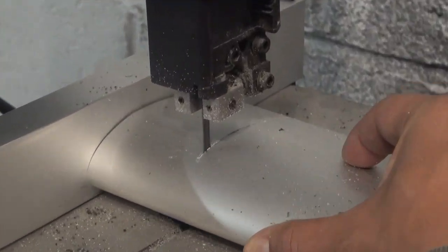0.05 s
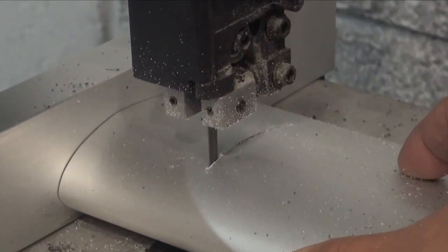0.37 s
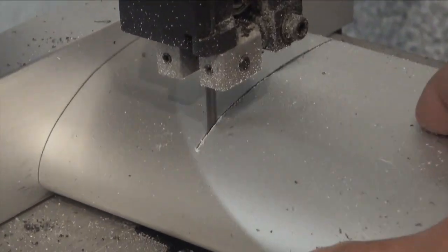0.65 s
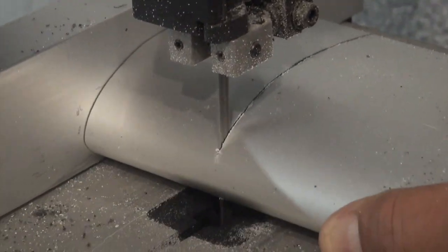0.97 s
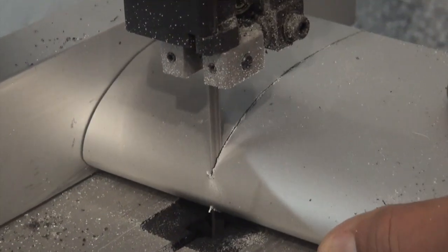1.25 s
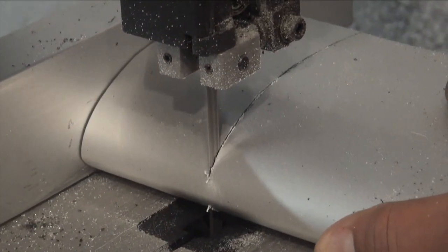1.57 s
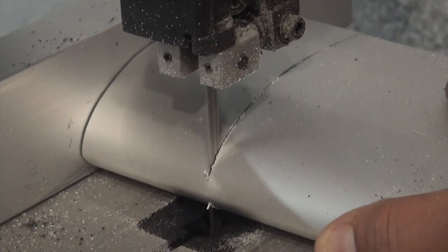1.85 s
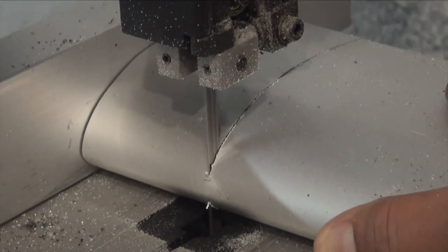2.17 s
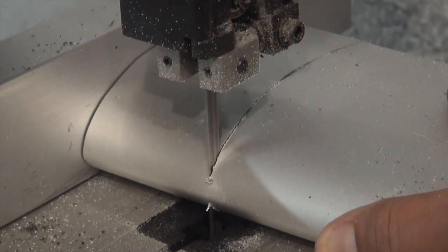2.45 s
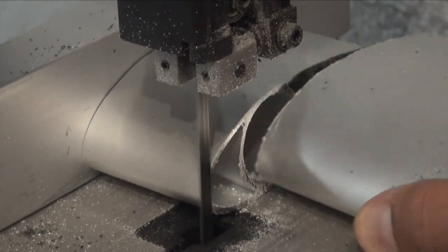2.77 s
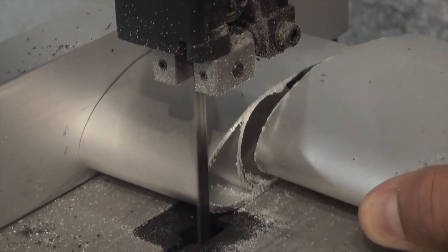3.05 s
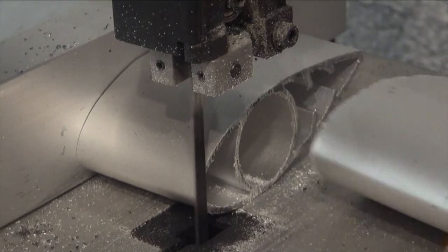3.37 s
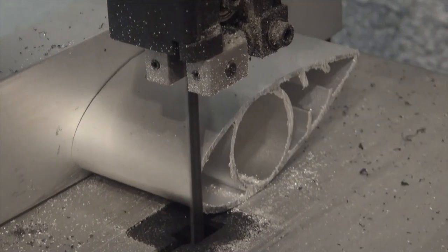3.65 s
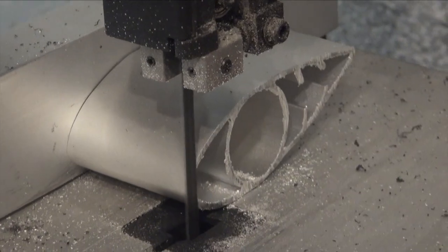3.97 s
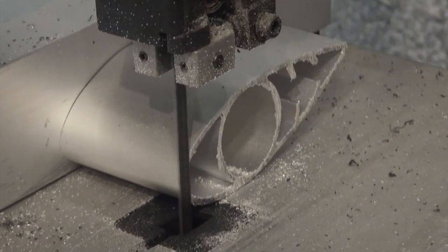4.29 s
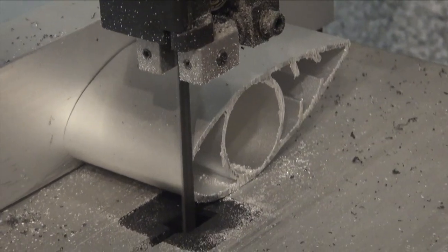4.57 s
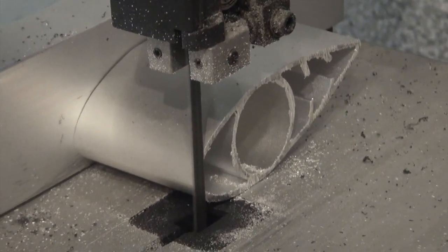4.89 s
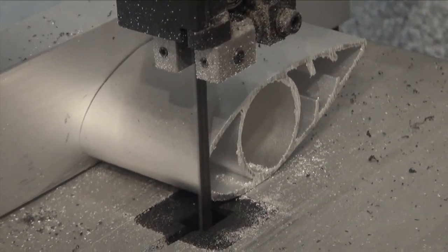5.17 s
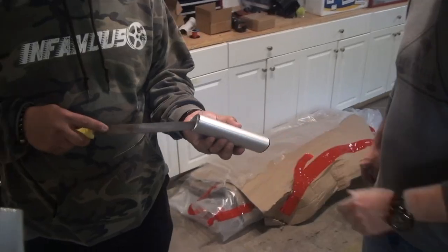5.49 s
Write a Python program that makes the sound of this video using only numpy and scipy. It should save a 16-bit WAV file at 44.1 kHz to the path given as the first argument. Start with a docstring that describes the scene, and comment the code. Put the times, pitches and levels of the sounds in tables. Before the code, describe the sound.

Choppy metallic squeals and a harsh, ringing rasp as a band saw cuts aluminium, followed by the free blade running and rattling.

```python
"""First come sharp squeals in choppy snatches: a benchtop band saw cuts a thin, hollow aluminium bar.
After a tiny gap the teeth rasp through the deep part, ringing the bar while the motor slows.
The freed blade whirrs and rattles in its guides over the motor's hum, and the cut piece slides away.
The saw's sound stops suddenly; a few soft knocks follow, and a file touches the cut piece.
One microphone hears it all from close by."""
import sys
import numpy as np
from scipy import signal
from scipy.fft import rfft, irfft
from scipy.io import wavfile
from scipy.ndimage import uniform_filter1d

SR = 44100
rng = np.random.default_rng(int(sys.argv[2]) if len(sys.argv) > 2 else 0)


def transcribe(u):
    """Save the signal u as a 16-bit wav file named by the first command-line argument.

    u: samples, shape (n,) or (channels, n), limited to [-1, 1]; the rate is SR.
    q: integer samples, one column per channel.
    """
    v = np.clip(np.atleast_2d(u).T, -1, 1)
    q = np.round(v * 32767).astype(np.int16)
    wavfile.write(sys.argv[1], SR, q)


N = 248283
TIME, FREQ = np.arange(N) / SR, np.fft.rfftfreq(N, 1 / SR)
GAP_S, BLADE_FREE_S, SAW_END_S, FILE_S = 1.244, 2.74, 5.247, 5.546
WOBBLES_PER_S = 17.5  # of the loose blade

# Squeals of the thin wall. Each row: start in seconds, length in seconds, pitch in Hz,
# relative level in dB, level of the octave above in dB compared with that.
SQUEALS = [(0, 0.016, 2360, -20.5, 3.5), (.035, 0.05, 1827, -21.5, -9), (0.185, 0.079, 3147, -22.5, -14),
           (0.222, 0.1, 2924, -24, -13), (0.304, 0.095, 2430, -32.5, -14), (0.396, .091, 2620, -23, -26),
           (0.487, 0.073, 2394, -20.5, -29), (0.551, 0.091, 2200, -23.5, -0.5),
           (0.663, .129, 2805, -24.5, -7), (0.836, 0.1, 2792, -17.5, -15), (.935, 0.13, 2484, -19.5, -3),
           (1.084, 0.097, 2025, -27, -11.5)]


def wall_squeals(edge_s=.014, sag_hz_per_s=373):
    """The thin wall squeals at three times the tooth rate, its pitch wavering and sinking."""
    out = np.zeros(N)
    for start, length, hz, db, octave_db in SQUEALS:
        span = slice(max(int((start - edge_s) * SR), 0), int((start + length + edge_s) * SR))
        gate = between(start, start + length, edge_s)[span]
        waver_hz = 22 * wander(24).real[span]
        turns = np.cumsum(hz + waver_hz - sag_hz_per_s * (TIME[span] - start)) / SR
        # the faint tooth rate, the squeal itself, its octave
        for multiple, part_db, width_hz in [(1 / 3, -27.5, 27), (1, 0, 11.2), (2, octave_db, 67)]:
            drift = wander(width_hz)[span]
            wave = (drift / (abs(drift) + .14) ** .45 * np.exp(2j * np.pi * multiple * turns)).real
            out[span] += amp(db + part_db) * unit(gate * wave) * np.sqrt(np.mean(gate))
    return out


# Snatches of sawing. Each row: start in seconds, relative hiss and fizz levels in dB,
# fading in dB per second, pitch of the wall's ring in Hz, its relative level in dB.
SAWING_SNATCHES = [(0, -24.5, -38, 86, 4690, -30.5), (0.078, -34, -39.5, 64.5, 4400, -53),
                   (0.181, -26.5, -30, -27.5, 4430, -25.5), (.335, -26, -34.5, 16, 3960, -28),
                   (0.501, -30.5, -40.5, 10, 4332, -18.5), (0.634, -29, -22.5, 17, 4260, -26),
                   (.792, -24.5, -24, 4, 6130, -19), (0.94, -26.5, -29, 1, 6060, -20),
                   (1.087, -29, -37, 30.5, 5300, -38.5)]
# Tone of the scrape's middle, top and bottom. Each row: frequency in Hz, relative level in dB.
HISS_TONE = [(880, -33), (1500, -16), (1730, -20), (2350, 0), (3200, -2.5), (3660, -7), (4320, 0),
             (5170, -8), (6190, -2.5), (9000, -20), (11700, -55), (19800, -120)]
FIZZ_TONE = [(4710, -51), (8000, -1), (9580, 4.5), (10400, 2), (10700, 1), (11200, 5), (13400, -7),
             (15700, -13.5)]
LOW_SCRAPE_TONE = [(120, -39), (250, -13), (450, 0), (620, -4), (850, 3), (1100, -4.5), (1800, -8),
                   (3500, -35.5)]
# Loudness of the low scrape. Each row: time in seconds, relative level in dB.
LOW_SCRAPE_LEVELS = [(0.0, -29), (0.01, -44), (0.182, -55.5), (0.832, -39), (0.99, -35.5), (1.08, -32),
                     (1.24, -55)]
# The wall's highest ringing notes. Each row: pitch in Hz, width in Hz, relative level in dB.
WALL_NOTES = [(8130, 280, 5.5), (10650, 200, -11), (11460, 300, -6.5), (12620, 300, 0), (13100, 350, -1)]


def choppy_sawing(sag_hz_per_s=700):
    """Short, abruptly changing snatches of sawing, each with its own hiss and ring."""
    starts, hiss_db, fizz_db, fading, wall_hz, wall_db = np.transpose(SAWING_SNATCHES)
    snatch = np.maximum(np.searchsorted(starts, TIME) - 1, 0)
    middles = (starts + np.append(starts[1:], GAP_S)) / 2
    from_middle_s = TIME - middles[snatch]
    fade = amp(-fading[snatch] * np.clip(from_middle_s, -.1, .1))
    hiss_gain, fizz_gain, wall_gain = (uniform_filter1d(amp(db)[snatch] * fade, size=400)
                                       for db in (hiss_db, fizz_db, wall_db))
    turns = np.cumsum(wall_hz[snatch] - sag_hz_per_s * from_middle_s) / SR
    blur = np.interp(wall_hz[snatch], [4300, 6200], [0, 1])  # a higher ring is less clear
    clear = np.sqrt(1 - blur) * tone(turns, 50, steadiness=.14)
    blurred = np.sqrt(blur) * tone(turns, 210, steadiness=.29)
    singing = wall_squeals() + wall_gain * (clear + blurred)
    singing *= flutter(250, depth_db=1.5) * flutter(40, depth_db=1.8)  # uneven teeth roughen it
    scrape = shimmer(noise(), depth_db=5.5, hold_s=.066, width_hz=140) * flutter(48, depth_db=2)
    hiss = amp(.5) * hiss_gain * colour(scrape, HISS_TONE)
    fizz = fizz_gain * (amp(-4) * colour(scrape, FIZZ_TONE) + amp(-1.5) * ring(scrape, WALL_NOTES))
    low = amp(curve(LOW_SCRAPE_LEVELS) - .5) * colour(scrape, LOW_SCRAPE_TONE)
    return (amp(-.8) * singing + hiss + fizz + low) * between(-1, GAP_S, .003)


# Teeth meeting the metal as the motor slows. Each row: time in seconds, teeth per second.
TOOTH_RATES = [(1.26, 998), (1.5, 976), (1.75, 947), (2.1, 906), (2.4, 888), (2.6, 880), (2.74, 858)]
# Tone of tearing metal. Each row: frequency in Hz, relative level in dB.
RASP_TONE = [(110, -41), (270, -16.5), (480, -0.5), (800, -12), (1450, -1), (1700, -7.5), (2400, 2),
             (3400, -1.5), (4400, 2), (7000, -4), (8300, 1), (10500, -4), (13400, -1.5), (15700, -11.5)]
# The hollow bar's ringing notes. Each row: pitch in Hz, width in Hz, relative level in dB.
BAR_NOTES = [(3116, 53, 5), (3470, 160, -1), (4200, 870, -5), (4870, 110, -13), (5835, 255, 8.5),
             (6500, 47, 9.5), (7790, 280, -8), (8950, 300, -13), (9940, 540, -10), (11950, 160, -16),
             (11500, 210, -4.5), (12400, 230, -5), (13500, 310, -7)]


def deep_cut(full_s=1.286, through_s=2.723):
    """Each tooth tears off a chip, and these puffs of noise ring the bar."""
    rate = curve(TOOTH_RATES)
    turns = np.cumsum(rate) / SR
    puffs = unit(noise() * (.61 + np.exp(-(turns % 1) / .48))) * flutter(200, depth_db=1)
    tearing = shimmer(puffs, depth_db=3, hold_s=.3, width_hz=90)
    push_db = -17 + 2 * (TIME - full_s)  # the blade slowly bears harder
    push_db -= 740 * np.maximum(full_s - TIME, 0)  # sinking in
    push_db -= 680 * np.maximum(TIME - through_s, 0)  # breaking through
    ring_gain = amp(curve([(1.7, -4.5), (2.5, -12)]))  # less ring as the last of the wall is cut
    rasp = amp(push_db) * (amp(-2.3) * colour(tearing, RASP_TONE) + ring_gain * ring(tearing, BAR_NOTES))
    return rasp * between(1.256, 6, .008) + amp(-2) * chatter(rate, turns) * between(1.275, 2.735, .022)


# Notes that chatter during the cut. Each row: pitch in Hz, how near an overtone must come in Hz,
# relative level in dB, unsteadiness in Hz.
CHATTER_NOTES = [(858, 89, -38, 7.3), (1844, 120, -33, 4.2), (2607, 53, -18, 30), (2710, 36, -26, 21),
                 (2923, 26, -29.5, 12), (2995, 13.5, -17.5, 20), (3802, 66, -21.5, 7.8),
                 (4800, 66, -26, 20), (5297, 60, -23, 12), (5926, 190, -32.5, 45), (8130, 310, -23.5, 160)]


def chatter(tooth_rate, tooth_turns):
    """An overtone of the tooth rate swells when it slides into one of the metal's own notes."""
    mean_rate = np.mean(np.transpose(TOOTH_RATES)[1])
    out = np.zeros(N)
    for hz, reach, db, width in CHATTER_NOTES:
        overtone = round(hz / mean_rate)
        nearness = np.exp(-.5 * ((overtone * tooth_rate - hz) / reach) ** 2)
        out += amp(db) * nearness * tone(overtone * tooth_turns, width, steadiness=.8)
    catches = np.cumsum(29 * (1 + .55 * wander(10).real)) / SR  # the teeth catch and let go
    return out * unit(np.minimum(1 + .75 * np.cos(2 * np.pi * catches), 1.3))


# Tone of the free blade's whirr and hiss. Each row: frequency in Hz, relative level in dB.
WHIRR_TONE = [(150, -48.5), (250, -24.5), (322, -7), (385, 0), (646, -3.5), (806, 3.5), (890, -5.5),
              (1270, -1.5), (1780, -6), (1930, 2.5), (2180, 2.5), (2600, -9.5), (3500, -35), (4550, -57.5),
              (7700, -120)]
BLADE_HISS_TONE = [(1760, -34.5), (3000, 17), (3570, 2), (5330, 4), (5870, -2), (7020, -46), (7790, 14),
                   (10300, -39), (11600, -14), (15700, -15)]
# Ringing notes of the blade and its bearings. Each row: pitch in Hz, width in Hz, relative level in dB.
BLADE_NOTES = [(3773, 120, -5), (4260, 135, 3.5), (4946, 83, 5), (5834, 166, 2.5), (7570, 100, -14),
               (8600, 190, -9), (10000, 73, -26)]
BEARING_NOTES = [(9720, 130, -12), (11650, 200, -9), (12000, 190, 0), (13300, 300, -1), (14250, 400, -7),
                 (15370, 220, -4)]


def free_blade():
    """The blade whirrs through the table and chirps in its guide bearings, slowly growing louder."""
    age = np.maximum(TIME - BLADE_FREE_S, 0)
    graze_db = 14.5 * np.exp(-age / .063)  # at first it still grazes the cut face
    rush = shimmer(noise(), depth_db=3.5, hold_s=.025, width_hz=170) * flutter(45, depth_db=1.3)
    whirr = amp(-39 + 3.5 * age + graze_db) * colour(rush, WHIRR_TONE)
    rub = shimmer(noise(), depth_db=3, hold_s=.018, width_hz=400) * flutter(27, depth_db=4)
    steel = ring(rub, BLADE_NOTES) + amp(-9) * colour(rub, BLADE_HISS_TONE)
    steel *= amp(-45 + 2 * age + graze_db)
    chirps = np.zeros(N)
    for hz, width, db in BEARING_NOTES:
        wobbles = np.cumsum(WOBBLES_PER_S * (1 + .45 * wander(6).real)) / SR + rng.random()
        touch = unit(amp(7.5 * np.cos(2 * np.pi * wobbles)) * abs(wander(12)))
        chirps += amp(db) * touch * tone(hz * TIME, width / 2, steadiness=0)
    chirps *= amp(-54.5 + 3 * age)
    whistle = amp(-47) * tone(8520 * TIME, 60, steadiness=0) * between(2.87, 3.11, .04)
    return (whirr + steel + chirps + whistle) * between(BLADE_FREE_S, 6, .0069)


# The blade's hardest slaps. Each row: start in seconds, relative level in dB, rough length in seconds.
SLAPS = [(3.017, -23, 0.0035), (3.454, -24, 0.012), (3.817, -24, .01), (4.001, -23.5, 0.0055),
         (4.054, -17.5, .01), (4.115, -17, 0.0088), (4.171, -18, 0.022), (4.227, -19, 0.027),
         (4.383, -18, 0.038), (4.464, -20, .012), (4.501, -17, 0.018), (4.655, -20.5, 0.012),
         (4.767, -20.5, 0.0117), (4.833, -14.5, 0.025), (5.054, -15.5, 0.0076), (5.121, -24, 0.0087),
         (5.154, -17.5, 0.014), (5.22, -14.5, 0.016)]
# The guides' ringing notes. Each row: pitch in Hz, width in Hz, relative level in dB.
GUIDE_NOTES = [(993, 41, -5), (1259, 36, -7), (1477, 28, 0.5), (1904, 51, 4.5), (2253, 84, 1),
               (2850, 35, 1), (3360, 76, -22)]
# Tone of a slap. Each row: frequency in Hz, relative level in dB.
SLAP_TONE = [(250, -43), (500, -2), (1400, -16.5), (2000, -3), (2800, 7.5), (3500, -22.5), (6000, 0.5),
             (8000, -21), (15000, -24)]


def blade_rattle():
    """The loose blade buzzes against its guides in short bursts, and early on the wheels clonk again and again."""
    taps = []
    for start, luck in zip(loose_beats(BLADE_FREE_S, SAW_END_S, WOBBLES_PER_S), rng.standard_normal(64)):
        # each wobble gives a light tap, unless a hard slap takes its place
        if min(abs(start - slap[0]) for slap in SLAPS) > .6 / WOBBLES_PER_S:
            tap_db = min(-34.5 + 4.5 * (start - BLADE_FREE_S), -28) + .7 * luck
            taps.append((start, tap_db, .014))
    force = sum(amp(db) * burst(start, .85 * length, .0033) for start, db, length in SLAPS + taps)
    buzz = force * shimmer(noise(), depth_db=1.9, hold_s=.025, width_hz=200) * flutter(600, depth_db=1.4)
    metal = amp(-6) * ring(buzz, GUIDE_NOTES) + amp(-29) * ring(buzz, BLADE_NOTES)
    clacks = sum(burst(start, 0, .0065) for start in loose_beats(BLADE_FREE_S, 4.3, WOBBLES_PER_S / 2))
    wheel_clonks = amp(-29) * clacks * tone(1330 * TIME, 160, steadiness=.3)
    return metal + amp(-12.5) * colour(buzz, SLAP_TONE) + wheel_clonks


# Flying chips. Each row: start in seconds, level in dB, seconds to fade by 60 dB.
CHIPS = [(3.458, -38, .03), (3.921, -20, 0.049), (4.178, -35, 0.033)]


def chip_clicks():
    """The blade flicks away a few chips of metal, each with a click."""
    flicks = sum(amp(db - 60 * abs(TIME - start) / fade) * (TIME > start) for start, db, fade in CHIPS)
    click_tone = [(100, -50), (500, -16), (1000, 3), (3000, 4), (6000, 1), (12000, -12), (16000, -22.5)]
    return colour(flicks * noise(), click_tone)


# Scrapes of the cut piece. Each row: start in seconds, length in seconds, level in dB.
SLIDES = [(3.458, 0.053, -42.5), (3.56, 0.012, -37.5), (3.71, 0.032, -41)]
# Its notes as it slides. Each row: pitch in Hz, width in Hz, relative level in dB.
SLIDE_NOTES = [(2570, 180, -14), (2840, 140, 8.5), (3280, 110, 8.5), (4360, 190, -2), (4900, 250, -13)]


def sliding_piece():
    """The cut piece scrapes over the chips on the table as it is drawn away."""
    contact = sum(amp(db) * burst(start, length, release_s=.02) for start, length, db in SLIDES)
    return contact * ring(noise(), SLIDE_NOTES)


# Loudness of the hum. Each row: time in seconds, relative level in dB.
HUM_LEVELS = [(0.0, -59), (0.03, -64), (0.42, -59.5), (0.57, -46), (0.67, -66), (1.08, -49.5), (1.12, -67),
              (1.4, -47), (3.33, -46), (3.82, -40.5), (4.18, -51), (4.51, -39.5), (5.23, -37)]
# Notes of the smoothly running motor. Each row: pitch in Hz, relative level in dB.
HUM_NOTES = [(91.5, -22.5), (150.7, 2.5), (199.2, 2), (236.9, -8), (328.4, -20), (393, -4), (457.6, -16),
             (527.6, -3.5)]


def motor_hum():
    """Motor and wheels hum: smoothly when running free, roughly under load or when the frame shakes."""
    smooth = unit(sum(amp(db) * tone(hz * TIME, 4.8, steadiness=1) for hz, db in HUM_NOTES))
    loaded = unit(tone(178 * TIME, 6.7, steadiness=.93) + .5 * tone(148 * TIME, 6, steadiness=.5))
    shaking = unit(tone(152 * TIME, 7.6, steadiness=.93) + .79 * tone(166 * TIME, 15, steadiness=.39))
    free, cutting = between(2.92, 4.12, .45), between(1.35, 2.8, .11)
    otherwise = np.clip(1 - free - cutting, 0, 1)
    hum = amp(1) * np.sqrt(free) * smooth + np.sqrt(cutting) * loaded + np.sqrt(otherwise) * shaking
    return amp(curve(HUM_LEVELS) - 1) * hum


# The saw frame's notes. Each row: pitch in Hz, width in Hz, relative level in dB.
FRAME_NOTES = [(317.8, 12, -5), (343.3, 21, 2), (362.5, 18, -2.5), (374, 20, -10.5), (537, 82, -14),
               (712, 56, -12.5), (812, 70, -16.5)]
# Loudness of its shaking. Each row: time in seconds, relative level in dB.
DRONE_LEVELS = [(4.15, -48), (4.504, -32.5), (4.628, -40), (4.904, -26), (4.976, -34), (5.214, -29),
                (5.23, -27.5)]


def frame_drone():
    """The shaking frame drones, building slowly at first and surging near the end."""
    drone = unit(sum(amp(db) * tone(hz * TIME, width / 2, steadiness=.31)
                     for hz, width, db in FRAME_NOTES))
    drone_db = curve(DRONE_LEVELS) + 3.1 - 2 * np.maximum(DRONE_LEVELS[0][0] - TIME, 0)
    return amp(drone_db) * drone * between(GAP_S, 6, .8)


# The cut piece's notes under the file. Each row: pitch in Hz, width in Hz, relative level in dB.
FILED_NOTES = [(1925, 23, 2.5), (2420, 41, 0), (3110, 40, -2), (3300, 44, -3), (4000, 50, -8),
               (4270, 40, 0), (5500, 90, -11)]
# Tone of the file's scrape. Each row: frequency in Hz, relative level in dB.
FILE_TONE = [(59, -46), (100, -1.5), (1770, -18.5), (2470, -2), (2920, -14.5), (4090, -6), (4640, -32),
             (5370, -20), (15000, -22.5)]


def file_stroke():
    """A file lands with a tick, then rubs ever louder and makes the cut piece ring."""
    tick = amp(-35.5) * burst(FILE_S, .0018, release_s=.0036)
    rub = amp(-52 + 126 * (TIME - FILE_S)) * (TIME > FILE_S)
    stroke = (tick + rub) * noise() * flutter(300, depth_db=6.5)
    return amp(-1.5) * ring(stroke, FILED_NOTES) + amp(-5.5) * colour(stroke, FILE_TONE)


# Knocks. Each row: start in seconds, level in dB, pitch in Hz, width in Hz, seconds to fade by 60 dB.
KNOCKS = [(0.789, -33, 471, 100, 0.28), (0.904, -43, 131, 60, 0.19), (2.071, -49, 85, 50, .08),
          (5.282, -36.5, 1160, 1700, 0.043), (5.28, -36.5, 53.9, 30.3, 0.38), (5.306, -29, 230, 280, 0.029),
          (5.307, -30, 52.85, 32, 0.23)]


def handling_knocks():
    """Handling things at the bench makes soft knocks, each a blurry note that dies away."""
    out = np.zeros(N)
    for start, db, hz, width, fade in KNOCKS:
        gain = amp(db - 60 * abs(TIME - start) / fade) * between(start, 6, .0026)
        out += gain * tone(hz * TIME, width / 2, steadiness=.8)
    return out


# Tone of the quiet workshop. Each row: frequency in Hz, relative level in dB.
ROOM_TONE = [(35, -36.5), (60, -27.5), (188, -15.5), (243, -1), (299, -30.5), (616, -14), (795, -21.5),
             (1970, -25), (2220, -12.5), (3220, -34), (3610, -16), (4780, -22.5), (5370, -18), (8750, -38),
             (15700, -27.5)]


def room_noise():
    """A faint, steady hush fills the workshop."""
    return amp(-60) * colour(noise(), ROOM_TONE)


def add_echoes(x, echo_db, fade_s):
    """Sound bounces off the table, the frame and the walls, fading by 60 dB in fade_s."""
    delay = np.arange(SR // 2) / SR
    echoes = rng.standard_normal(len(delay)) * (rng.random(len(delay)) < .06)
    echoes *= (delay > .002) * amp(-60 * delay / fade_s)
    return x + amp(echo_db) * signal.fftconvolve(x, echoes / np.linalg.norm(echoes))[:N]


def amp(db):
    """Turns decibels into a gain."""
    return 10 ** (np.asarray(db) / 20)


def unit(x):
    """Scales x to an average power of 1."""
    return x / np.sqrt(np.mean(abs(x) ** 2) + 1e-20)


def curve(rows):
    """Joins (seconds, value) points with straight lines."""
    return np.interp(TIME, *np.transpose(rows))


def between(start, end, fade):
    """One from start to end, with sloping edges; all in seconds."""
    return np.clip((TIME - start) / fade + .5, 0, 1) * np.clip((end - TIME) / fade + .5, 0, 1)


def burst(start, length, release_s):
    """A contact that sets in at once, holds, and dies away."""
    return between(start + .001, 6, .002) * np.exp(-np.maximum(TIME - start - length, 0) / release_s)


def loose_beats(start, end, per_s):
    """Regular moments, each a little late by chance."""
    beats = np.arange(start, end, 1 / per_s)
    return beats + rng.uniform(0, .6, 64)[:len(beats)] / per_s


def noise():
    """White noise."""
    return rng.standard_normal(N)


def wander(width_hz, size=16384):
    """Random drift in size and phase (complex numbers), no faster than about width_hz."""
    hz = np.fft.fftfreq(size, TIME[-1] / size)
    spectrum = (rng.standard_normal(size) + 1j * rng.standard_normal(size)) / (1 + (hz / width_hz) ** 2)
    return np.interp(TIME, np.linspace(0, TIME[-1], size), unit(np.fft.ifft(spectrum)))


def flutter(rate_hz, depth_db):
    """A randomly trembling gain."""
    return unit(amp(depth_db * unit(wander(rate_hz).real)))


def tone(turns, width_hz, steadiness):
    """A drifting note that follows a count of cycles; steadiness near 1 evens out its loudness."""
    drift = wander(width_hz)
    return unit((drift / (abs(drift) + .12) ** steadiness * np.exp(2j * np.pi * turns)).real)


def colour(x, points):
    """Shapes the tone of x along (Hz, dB) points; white noise keeps its power."""
    hz, db = np.transpose(points)
    return irfft(rfft(x) * unit(amp(np.interp(np.log(FREQ + 1), np.log(hz), db))), N)


def ring(x, notes):
    """Lets x ring an object's own notes; white noise keeps its power."""
    response = sum((-1) ** k * amp(db) * 1j * FREQ * width / (hz ** 2 - FREQ ** 2 + 1j * FREQ * width)
                   for k, (hz, width, db) in enumerate(notes))
    return irfft(rfft(x) * unit(response), N)


def shimmer(x, depth_db, hold_s, width_hz):
    """Narrow peaks come and go at random, as they do when a cut moves through metal."""
    spectra = signal.stft(x, nperseg=1024, noverlap=768)[2]
    hills = rng.standard_normal(spectra.shape)
    for axis, span in enumerate([width_hz * 1024 / SR, hold_s * SR / 256]):  # smooth in pitch, then time
        size = max(1, round(span))
        hills = uniform_filter1d(uniform_filter1d(hills, size, axis), size, axis)
    spectra = spectra * amp(depth_db * unit(hills))
    return unit(signal.istft(spectra, nperseg=1024, noverlap=768)[1][:N])


def scene():
    """The saw, with one tiny gap and a sudden end, over the quiet sounds of the bench."""
    saw = choppy_sawing() + deep_cut() + free_blade() + blade_rattle() + chip_clicks()
    saw += sliding_piece() + motor_hum() + frame_drone()
    saw = add_echoes(saw, echo_db=-11.5, fade_s=.26)
    gap = between(GAP_S, GAP_S + .011, .0027)
    saw *= between(-1, SAW_END_S, .00076) * (1 - gap)
    mono = saw + room_noise() + handling_knocks() + file_stroke()
    return np.array([mono, mono])


def record(dry):
    """The microphone drops the deepest bass, rounds off the tallest peaks and cuts the highest treble."""
    dry = signal.sosfilt(signal.butter(3, 28, "highpass", fs=SR, output="sos"), dry)
    clipped = np.clip(dry, -.6, .6)
    rounded = clipped + .2 * np.tanh((dry - clipped) / .2)
    treble_cut = signal.firwin(601, 15750, window=("kaiser", 9), fs=SR)
    return signal.oaconvolve(rounded, treble_cut[None], "same", axes=1)


dry = scene()
out = record(dry)
transcribe(out)
```